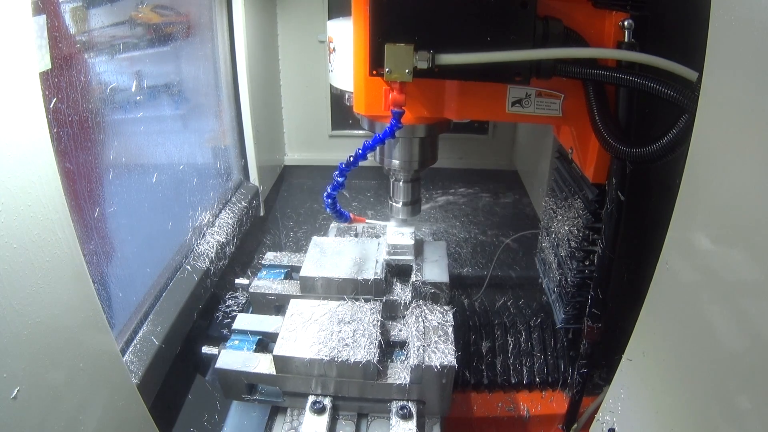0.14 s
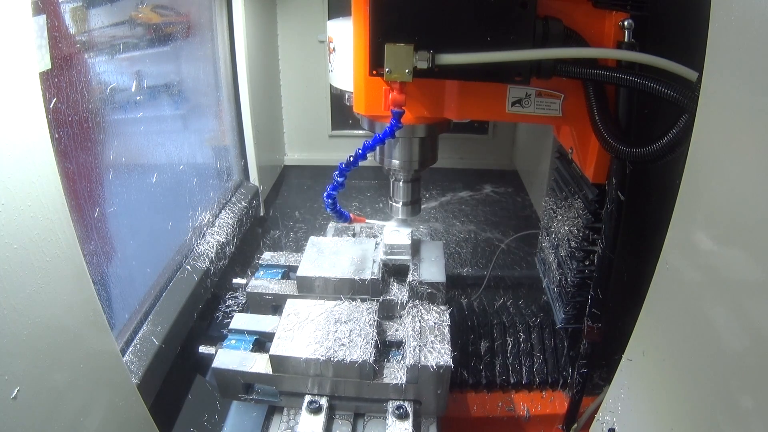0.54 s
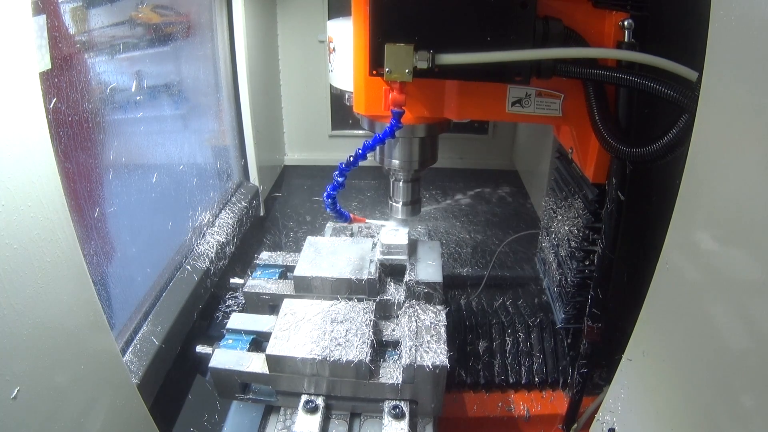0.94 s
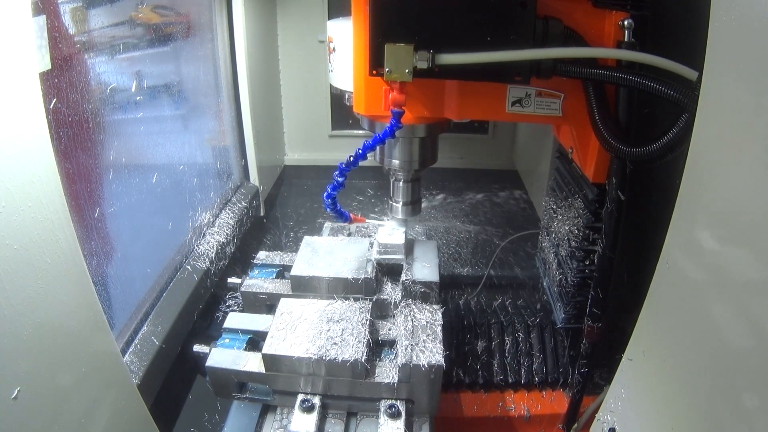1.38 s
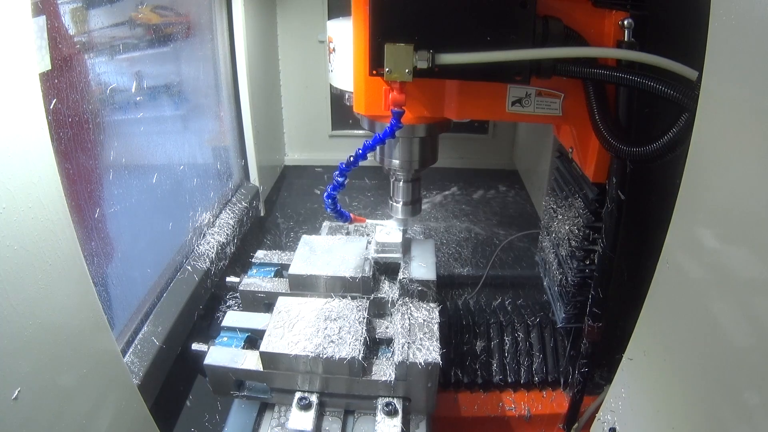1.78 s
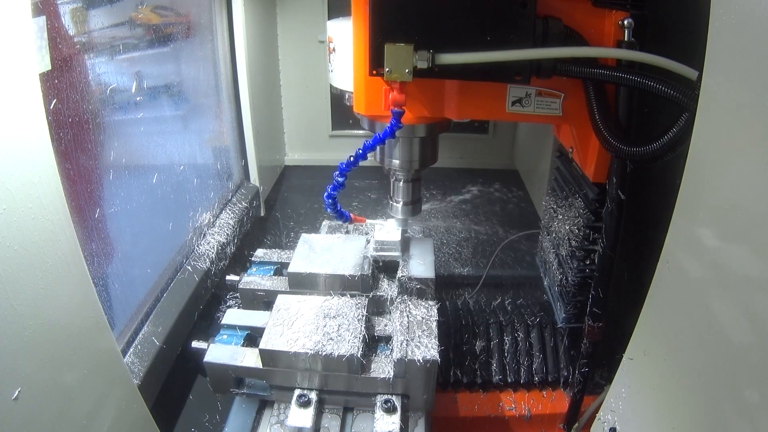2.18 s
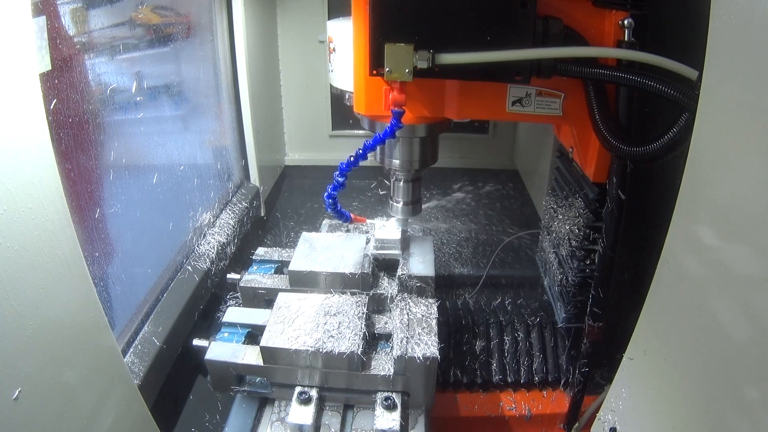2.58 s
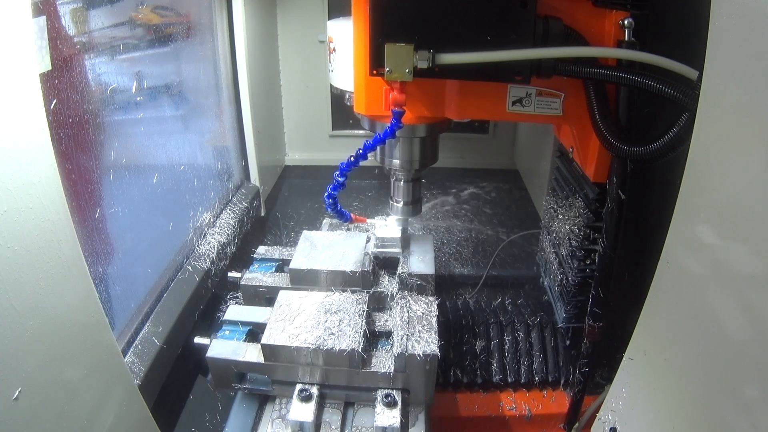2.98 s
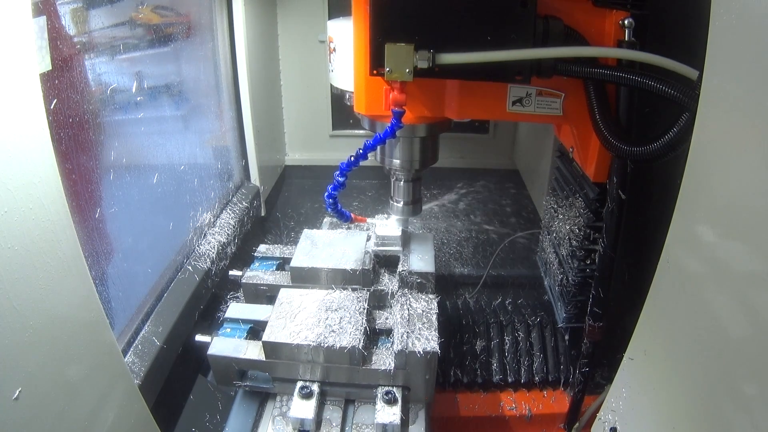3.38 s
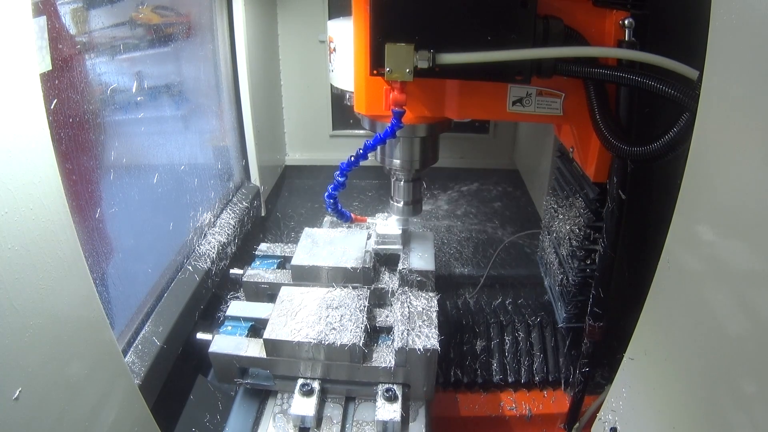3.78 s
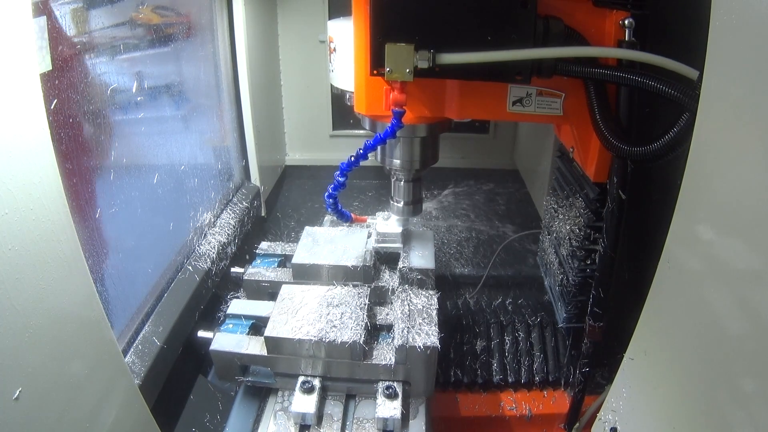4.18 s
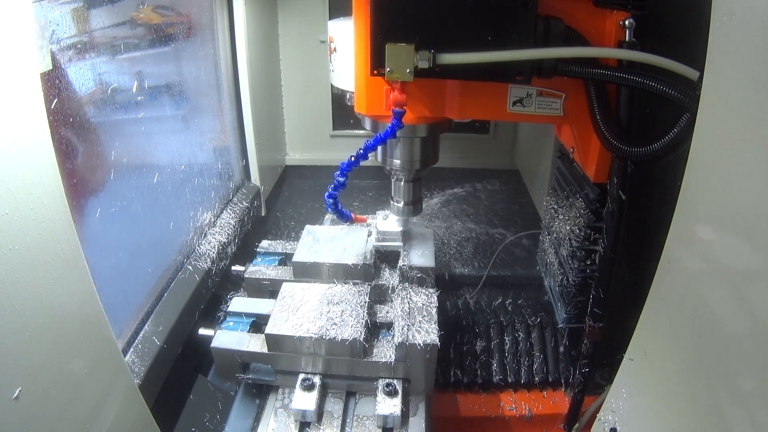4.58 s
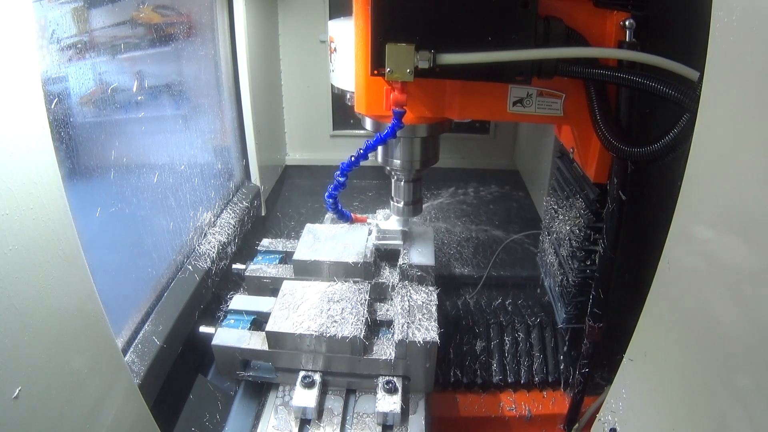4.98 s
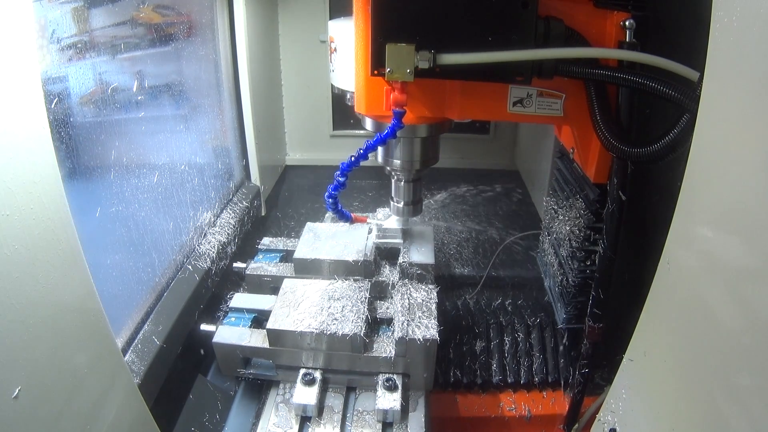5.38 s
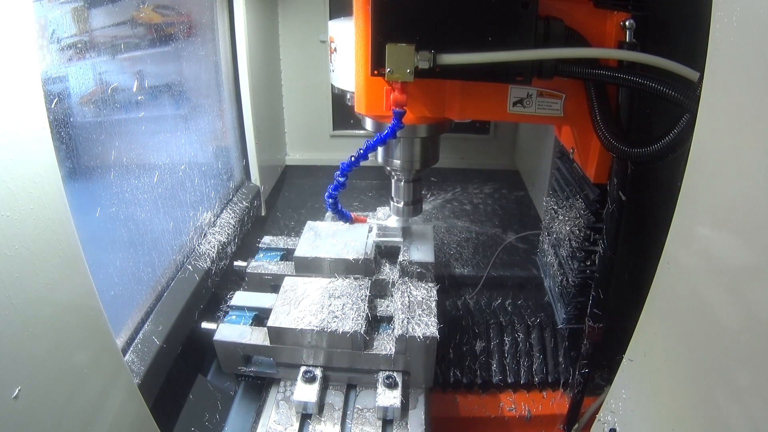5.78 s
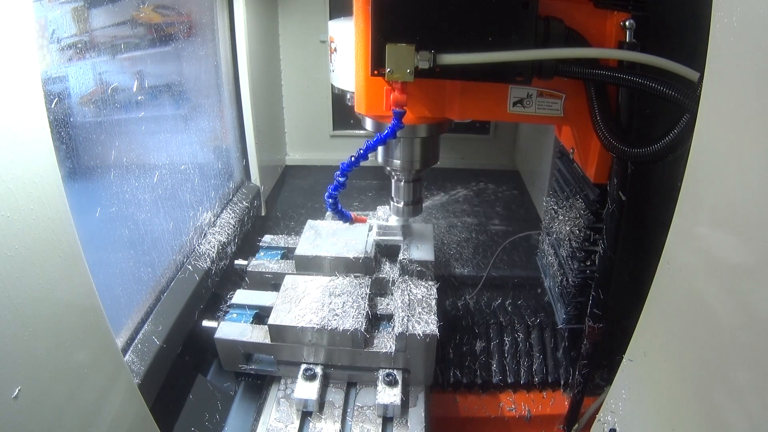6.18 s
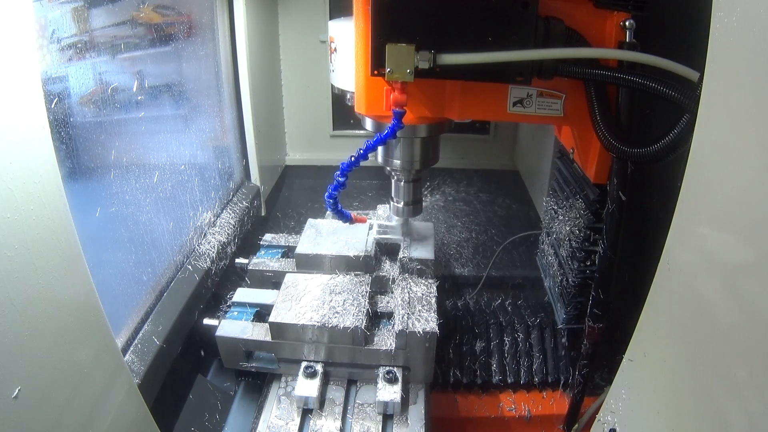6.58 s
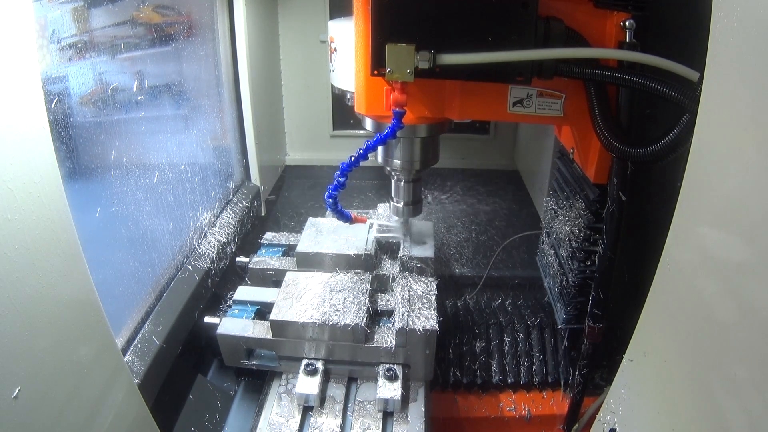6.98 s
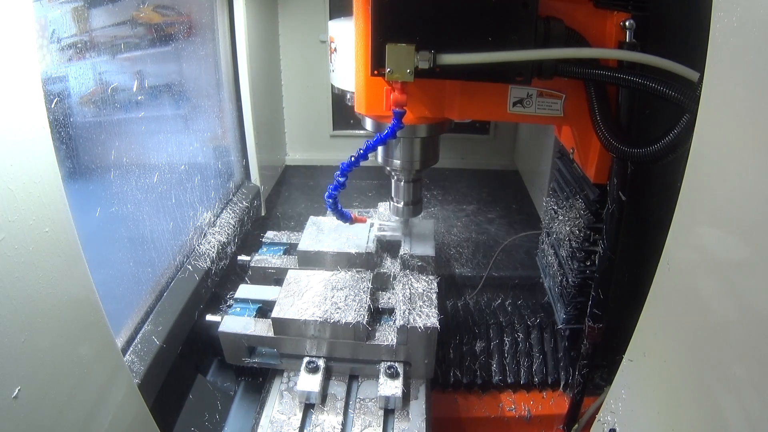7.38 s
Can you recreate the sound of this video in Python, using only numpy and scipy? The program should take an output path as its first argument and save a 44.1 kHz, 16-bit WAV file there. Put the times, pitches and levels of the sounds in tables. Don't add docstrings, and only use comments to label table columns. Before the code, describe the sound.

Steady, shrill metallic whine from a cutting spindle fills a small resonant machine box in a workshop. Individual tones slowly swell and fade as the work moves, with chatter and bearing buzz roughening them. Broad airy hiss and low rumble lie beneath. Midway into the first half the feed drive growls and a low thump marks reversal; a gentler surge comes near the end. Near stereo pickup, treble dull at the very top with slight flickering dropouts.

```python
import sys
import numpy as np
from scipy import signal
from scipy.fft import rfft, irfft, next_fast_len
from scipy.io import wavfile
from scipy.ndimage import uniform_filter1d

SR = 44100
rng = np.random.default_rng(int(sys.argv[2]) if len(sys.argv) > 2 else 0)


def int16_out(signal):
    q = np.round(np.clip(np.atleast_2d(signal).T, -1, 1) * 32767)
    wavfile.write(sys.argv[1], SR, q.astype(np.int16))


def nominal_scale(level):
    x = np.asarray(level, float) / 20
    return 10 ** x


N = 425565
TIME_S = np.arange(N) / SR

# [t/s, speed/(turns per s)]
SHAFT_SPEED = [(0.0, 112.533), (3.38, 112.538), (3.46, 112.622), (3.96, 112.488), (4.04, 112.534),
               (4.15, 112.77), (4.45, 112.629), (4.75, 112.461), (5.28, 112.542), (7.38, 112.536),
               (7.49, 112.448), (7.81, 112.561), (8.19, 112.654), (8.47, 112.607), (8.88, 112.42),
               (9.01, 112.495), (9.65, 112.555)]
SHAFT_HZ = SHAFT_SPEED[0][1]
# [start t/s, end t/s]
CORNERS = [
    (3.4, 4.2),
    (8.0, 8.6),
]
# [start t/s, end t/s]
FRAME_TURNS = [
    (3.65, 3.9),
    (8.05, 8.35),
]

# [order, first level/dB, return level/dB, third level/dB, left lead/rad]
STRONG_TONES = [(22, -37.5, -45.5, -51, -.7), (27.86, -37.5, -41.5, -38.5, -.5),
                (29.52, -43.5, -38.5, -35, .1), (29.86, -34.5, -31.5, -34.5, -.9),
                (37.48, -31, -42, -41, 0), (39.48, -36.5, -34.5, -38, -.1), (45, -38.5, -36.5, -39.5, -.1),
                (46, -42.5, -39.5, -41.5, -.1), (47, -41, -38, -32.5, -.3), (48, -36, -30, -40, -.2),
                (49, -26, -25, -24.5, -.1), (50, -27.5, -25.5, -26.5, -.1), (51, -22.5, -23, -22, -.4),
                (52, -30, -30.5, -34, .1), (53, -31.5, -34.5, -34.5, 0), (54, -40, -36.5, -45.5, -.1)]
REFLECTIONS = [(22.0, 0.25, 0.65, 0.13, 0.73), (27.86, 0.7, 0.77, 0.78, 0.7),
               (29.52, 0.45, 0.35, 0.46, 0.58), (29.86, 0.05, 0.72, 0.08, 0.7),
               (37.48, 0.27, 0.09, 0.15, 0.65), (39.48, 0.22, 0.58, 0.23, 0.29),
               (45.0, 0.24, 0.01, 0.43, 0.04), (46.0, 0.52, 0.55, 0.19, 0.95),
               (47.0, 0.08, 0.42, 0.45, 0.6), (48.0, 0.19, 0.31, 0.07, 0.77),
               (49.0, 0.11, 0.93, 0.18, 0.17), (50.0, 0.52, 0.84, 0.25, 0.61),
               (51.0, 0.43, 0.19, 0.19, 0.45), (52.0, 0.79, 0.45, 0.29, 0.15),
               (53.0, 0.17, 0.47, 0.11, 0.29), (54.0, 0.18, 0.56, 0.23, 0.58)]
# [t/s, length/cm]
VICE_DETOUR = [(0, 0), (1.5, 1.65), (3, 3.7), (3.6, 4.7), (4.2, 4.1), (4.8, 5.3), (6.3, 6.95), (7.8, 9.3),
               (8.5, 10.6), (9.65, 10.9)]
TABLE_DETOUR_RATIO, SOUND_CM_PER_S = 1.77, 34300
# [t/s, left-right level/dB]
TOOL_PAN = [(0.0, 2.5), (1.21, 4.5), (2.58, -1), (4.84, 2), (6.96, -2), (7.55, 1), (8.28, -4.5), (9.65, 1)]
TOOL_FROM_ORDER = 44.5
STRIKE_CENTRE_ORDER = 50.5
STRIKE_SPREAD = .118
FLUTTER_DB, WANDER_CYCLES = .5, .045
BELT_TURNS = 26
BELT_TUG = (.0002, .00075, .0005)
BELT_START_LAPS = .63

# [order, first level/dB, return level/dB, left lead/rad]
CUTTER_TONES = [(2, -45.5, -44.0, -0.1), (6, -65.0, -47.5, -1.3), (7, -54.0, -50.0, -1.4),
                (8, -49.0, -51.0, -1.0), (9, -58.0, -50.5, -0.3), (12, -49.0, -47.0, -0.6),
                (20, -51.0, -53.0, -0.6), (21, -48.0, -45.0, -0.5), (24, -50.0, -49.0, -0.6),
                (25, -41.0, -47.0, -0.7), (27, -41.0, -48.0, -0.5), (30, -47.0, -44.5, -0.7),
                (31, -50.0, -52.0, -0.3), (34, -48.0, -53.0, -0.2), (38, -45.0, -46.0, -0.0),
                (40.043, -43.0, -48.0, -0.1), (44, -41.0, -43.0, -0.0), (55, -48.0, -43.0, -0.1),
                (57, -50.0, -53.0, -0.6), (58, -44.0, -44.0, -0.4), (63, -53.0, -59.0, -0.9),
                (67, -49.0, -51.0, 0.3), (69, -54.0, -53.0, -0.5), (72, -56.0, -60.0, -0.1),
                (73, -57.0, -55.0, -0.6), (94, -66.0, -69.0, -0.2), (95, -66.0, -65.0, -0.2),
                (96, -64.0, -63.0, -0.4), (97, -61.0, -61.0, -0.1)]
# [order, first level/dB, return level/dB, left lead/rad]
MOTOR_TONES = [(0.73, -57.0, -52.0, 0.0), (1.655, -48.0, -50.0, -0.1), (2.42, -50.0, -52.0, -0.2),
               (2.66, -55.0, -54.0, -0.1), (3.67, -52.0, -52.0, -0.6), (4.59, -41.5, -45.5, -0.4),
               (5.48, -60, -46.5, -1.1), (6.88, -53.0, -54.0, -1.5), (7.38, -54.0, -55.0, -1.0),
               (8.238, -39.5, -38.0, -1.1)]
# [order, first level/dB, return level/dB,
# left lead/rad]
BEARING_AND_SIDEBAND_TONES = [(9.62, -47.0, -57.0, -0.9), (10.62, -47.0, -43.5, -0.8), (15.86, -59.0, -55.0, -0.5),
                              (18.24, -50.0, -54.0, -0.4), (20.24, -46.0, -48.0, -0.3), (20.55, -54.0, -50.0, -0.6),
                              (27.29, -60, -48.0, -0.9), (28.42, -52.0, -45.0, -0.4), (29.29, -44.0, -43.0, -0.6),
                              (30.42, -47.0, -42.5, -0.4), (30.86, -51.0, -53.0, -0.4), (38.91, -38.0, -50.0, 0.0),
                              (56.71, -48.0, -51.0, -0.3), (57.28, -52.0, -52.0, -0.3), (59.15, -49.0, -45.0, -0.7),
                              (59.71, -51.0, -49.0, -0.9), (60.28, -49.0, -57.0, 0.1), (65.9, -54.0, -53.0, -0.1),
                              (66.47, -53.0, -60.0, 0.2), (68.77, -45.0, -47.0, -0.3), (69.33, -50.0, -56.0, -0.2),
                              (9.627, -53.0, -62.0, -0.9),
                              (1.4, -47, -47, 0), (5, -58, -51, -.6), (10, -60, -58, -.8), (11, -60, -52, -.7),
                  (26.962, -47, -49, -.6), (29.088, -58, -49, -.6), (29.423, -56, -48, -.6),
                  (29.496, -58, -48, -.5), (29.957, -58, -43, -.8), (38.041, -54, -44, 0),
                  (38.498, -56, -47, 0), (39.423, -42, -54, 0), (39.462, -46, -55, 0), (43.85, -56, -47, 0),
                  (46.153, -49, -47, -.1), (49.094, -42, -54, -.1), (53.962, -44, -54, -.1)]
# [order, level/dB]
THIRD_PASS = [(4.59, -42), (5.48, -53), (29.29, -42), (6, -46), (8, -62), (8.238, -41), (9, -44),
              (9.62, -47), (10.62, -54), (12, -39), (10, -49), (5, -51), (29.957, -50), (20.24, -60),
              (24, -53), (28.42, -49), (30, -50), (55, -58)]
# [order, t/s, level/dB, half width/s]
TONE_SWELLS = [(1, 3.55, -9, .1), (4, 3.7, -9, .2), (4, 4.1, -4, .15), (4, 7.9, 2, .4), (5.48, 3.8, -6, .3),
               (22, 3.9, 3, .3), (29.29, 3.8, 8, .6), (29.29, 6.9, 5, .35), (29.86, 0, -3, .5),
               (29.86, 3.4, -7, .25), (29.86, 8.2, -3, .25), (29.86, 4.7, 2, .25), (22, 1.5, 1, 1.5),
               (30, 3.8, -8, .3), (30.42, 3, 4, .6), (30.42, 8, 5, .5), (12, 3, 9, .4), (12, 4.8, 6, .4),
               (12, 6.2, -4, .4), (12, 7.7, 5, .3), (55, .4, -9, .7), (55, 5, -12, .9), (44, 1.35, -8, .2),
               (44, 3.3, 3, .8), (44, 9, -3, .5), (30, 7.9, -12, .3), (39.48, .3, -5, .4),
               (37.48, 7.9, -10, .3), (50, 8.2, -7, .15), (52, 0, -4, .2), (4, 8.3, 2, .3),
               (4, 5.4, -3, .7), (3, 8.35, -8, .2), (3, 9.2, 3, .4), (51, 3.7, 1.5, .3), (49, 4.2, -2, .15),
               (4.59, 7.3, -2, .5), (68.77, 0, -7, .4), (68.77, 4.9, -5, .6), (68.77, 8.4, 4, .4),
               (97, 5.7, 6, .25), (97, 9.2, 6, .35), (28.42, 6.5, 2, 1)]
# [order, first silence t/s, beat/s, first level/dB, later level/dB]
BEATING_PAIR = (36.907, .9, 1.252, -39, -41.5)
BALL_PASS_ORDER, CAGE_ORDER = 9.62, .567
# [order, first level/dB, return level/dB]
CHATTER_LINES = [(44.519, -47, -55), (44.673, -46, -47), (44.75, -49, -49), (45.519, -54, -44),
                 (45.596, -48, -54), (45.635, -47, -54), (45.673, -47, -54), (45.75, -48, -55),
                 (46.519, -48, -51), (46.558, -38, -39), (46.596, -39, -41), (46.673, -47, -52),
                 (46.712, -47, -54), (47.519, -44, -48), (47.558, -48, -54), (47.635, -47, -55),
                 (48.519, -54, -41), (48.558, -55, -45), (48.635, -55, -49), (49.442, -45, -39),
                 (49.481, -53, -47), (49.519, -43, -47), (49.558, -35, -35), (50.404, -46, -53),
                 (50.442, -44, -40), (50.481, -41, -43), (50.519, -35, -33), (50.558, -35, -42),
                 (50.596, -43, -53), (51.481, -40, -47), (51.519, -41, -51), (52.404, -47, -52),
                 (52.481, -46, -51), (53.481, -46, -51), (53.519, -48, -52), (54.365, -48, -48),
                 (54.404, -47, -48)]
CHATTER_EASES_DB = -3

FRAME_ORDERS = (.45, 1, 3, 4)
# [first level/dB, return level/dB, third level/dB, share of feed surge, left lead/rad]
FRAME_LEVELS = [(-53.5, -51.5, -60, 0.97, 0), (-43.5, -34.5, -46.5, .01, 0.083),
                (-54, -47, -51.5, 0.18, -0.73), (-50.5, -44, -42.5, 0.68, -0.7)]
# [t/s, level/dB, start f/Hz, end f/Hz, length/s]
FRAME_JOLT = (3.35, -27, 192, 135, .13)
FEED_LEVELS = (-31.5, -30, -34)
# [f/Hz, width/Hz, level/dB]
FEED_MODES = [(1200, 45, 8), (1366, 108, 13.5), (1585, 38, 6)]
# [t/s, rise level/dB, half width/s]
FEED_SURGES = [
    (3.58, 7.5, 0.11),
    (3.87, 6, 0.074),
    (4.1, 4.5, 0.094),
    (4.35, 5.5, 0.086),
    (7.5, 3.5, 0.96),
    (7.95, 3, 0.06),
    (8.3, 5.5, 0.1),
]

# [t/s, level/dB]
CUT_LOAD = [(0, -43.5), (.9, -42), (2.7, -41), (4.4, -41.5), (5.25, -43), (6.8, -41), (8.3, -41),
            (9, -43.5), (9.65, -43)]
# [f/Hz, level/dB per Hz]
AIR_COLOUR = [(30, -18), (60, -54), (130, -1.5), (300, -8), (800, -6.5), (1300, -12), (1900, -8.5),
              (3300, -6.5), (5600, -7.5), (6700, -6.5), (6900, -16), (8200, -20), (10300, -30),
              (10950, -25)]
# [f/Hz, width/Hz, level/dB]
BOX_MODES = [(505, 91, 13.5), (943, 68, 7), (4150, 150, 1), (5450, 520, 15), (7730, 180, 12),
             (8170, 210, 8.5)]
# [f/Hz, width/Hz]
COLOUR_DIPS = [(370, 285), (412, 42), (572, 42), (1560, 150), (860, 130), (1055, 8.3), (1480, 190),
               (1986, 370), (3990, 210), (5430, 290), (6200, 220), (2560, 63)]
# [f/Hz, width/Hz, level/dB]
PANEL_MODES = [(184, 5.1, 1), (216, 110, -12.5), (144, 39, -18.5)]
# [t/s, rise level/dB, half width/s]
PANEL_BOOMS = [
    (.75, 2, 0.13),
    (2.2, 4.5, 0.1),
    (2.65, 4, 0.079),
    (3.75, 4, 0.1),
    (4.45, 7, 0.1),
    (7.5, 6.5, 0.1),
    (7.85, 4, 0.03),
    (8.1, 4.5, 0.057),
]
PANEL_DB, PANEL_PER_SURGE, PANEL_PER_LOAD = -39, .1, .37
# [f/Hz, width/Hz, level/dB]
FLOOR_MODES = [(50, 13, -7), (81.5, 3.2, 9), (62, 40, -12)]
FLOOR_DB = -52.5

# [f/Hz, left-right likeness]
PORT_LIKENESS = [(60, 0.85), (130, 0.99), (260, 0.91), (550, 1), (1160, 0.7), (2440, 1), (5130, 1),
                 (10800, 0.64)]
# [f/Hz, lead/rad]
PORT_LEAD = [(0, -0.12), (300, -0.12), (780, -1.26), (1290, -0.55), (3360, -1.22), (4050, -0.21),
             (6720, -1.1), (10900, 0.25)]
# [f/Hz, left-right level/dB]
PORT_BALANCE = [(60, 0.0), (110, 0.0), (190, 1.5), (340, 2.0), (600, 2.5), (1070, -1.0), (1910, 0.0),
                (3400, -0.5), (6050, 0.0), (10800, -0.5)]
CUTOFF_HZ = 11000
# [t/s, upper band level/dB, lower band level/dB]
TREBLE_FADES = [(.08, -8, -4), (1.05, -9, 0), (1.45, -6, -4), (2.4, -8, 0), (3.8, -22, -3), (3.96, -20, -8),
                (4.11, -16, -14), (4.68, -10, -4), (4.9, -14, -4), (4.97, -20, -10), (5.2, -14, -6),
                (5.33, -16, -4), (5.37, -18, -18), (5.62, -25, -8), (5.82, -16, -8), (6.32, -25, -22),
                (7.0, -14, -3), (7.22, -18, -8), (7.72, -18, -3), (8.38, -14, -3), (8.83, -14, -3),
                (9.02, -8, -5), (9.15, -14, -10), (9.24, -14, -12), (9.35, -25, -15), (9.57, -22, -12)]
# [low f/Hz, high f/Hz]
FADING_BANDS = ((8800, 10400), (6500, 7300))
FADE_HALF_WIDTH_S = .013
HOLE_EDGES_HZ, HOLE_SHARE = np.arange(8700, 10900, 240), .07


def strong_tones(turns, belt_db, sway):
    (detour_cm,), (tool_pan_db,) = in_time(VICE_DETOUR), in_time(TOOL_PAN)
    tug = by_pass(BELT_TUG) * np.sin(2 * np.pi * (turns / BELT_TURNS - BELT_START_LAPS))
    out = 0
    for direct, reflected in zip(STRONG_TONES, REFLECTIONS):
        order, *levels_db, lead = direct
        _, vice, vice_phase, table, table_phase = reflected
        from_tool = order > TOOL_FROM_ORDER
        waves = detour_cm[::64] * order * SHAFT_HZ / SOUND_CM_PER_S
        off_vice = vice * np.exp(2j * np.pi * (vice_phase + waves))
        off_table = table * np.exp(2j * np.pi * (table_phase + TABLE_DETOUR_RATIO * waves))
        summed = 1 + off_vice + off_table
        gain = every_sample(abs(summed) + .03)
        shift = every_sample(np.unwrap(np.angle(summed)) / (2 * np.pi))
        level_db = by_pass(levels_db) + tone_swell(order) + belt_pulse(turns, belt_db) + FLUTTER_DB * drift(3.9)
        pan_db = tool_pan_db if from_tool else at_hz(PORT_BALANCE, order * SHAFT_HZ)
        start = STRIKE_SPREAD * (order - STRIKE_CENTRE_ORDER) ** 2 if from_tool else rng.random()
        phase = start - shift + tug * order * from_tool + WANDER_CYCLES * drift(.2)
        out = out + gain * tone(turns, order, level_db, pan_db, lead + sway * drift(.58), phase)
    return out


def shaft_tones(table, turns, waver_db, belt_db, sway):
    out = 0
    for order, first_db, return_db, lead in table:
        level_db = pass_level(order, first_db, return_db) + waver_db * drift(.33)
        level_db = level_db + belt_pulse(turns, belt_db)
        pan_db = at_hz(PORT_BALANCE, order * SHAFT_HZ) + rng.normal(0, 1) * (order > 2)
        creep = drift(.12) / 5 / max(order, 10)
        out = out + tone(turns + creep, order, level_db, pan_db, lead + sway * drift(.0093))
    return out


def chatter(turns, waver_db):
    out = np.zeros(N)
    for order, first_db, return_db in CHATTER_LINES:
        level_db = by_pass([first_db, return_db, return_db + CHATTER_EASES_DB]) + waver_db * drift(.5)
        order = (np.floor(order * BELT_TURNS) + .5) / BELT_TURNS
        angle = 2 * np.pi * ((order * turns + rng.random()) % 1)
        out += np.repeat(nominal_scale(level_db[::64]), 64)[:N] * np.cos(angle.astype(np.float32))
    return np.sqrt(2) * out


def beating_pair(turns):
    order, first_silence, beat, first_db, later_db = BEATING_PAIR
    swing = 2 * np.sin(np.pi * (TIME_S - first_silence) / beat)
    return swing * tone(turns, order, by_pass([first_db, later_db, later_db]) + drift(.36), 0, 0)


def frame_tones(turns, surge_db):
    out = 0
    for order, (*levels_db, share, lead) in zip(FRAME_ORDERS, FRAME_LEVELS):
        level_db = by_pass(levels_db, FRAME_TURNS) + tone_swell(order) + share * surge_db + 1.84 * drift(.76)
        out = out + tone(turns, order, level_db, 0, lead)
    return out


def jolt():
    start, level_db, start_hz, end_hz, length = FRAME_JOLT
    age = np.clip((TIME_S - start) / length, 0, 1.5)
    hz = start_hz + (end_hz - start_hz) * np.clip(age, 0, 1) ** 2
    return nominal_scale(level_db) * np.sin(np.pi * age / 1.5) * np.sin(2 * np.pi * np.cumsum(hz) / SR)


def feed_drive(surge_db):
    return nominal_scale(by_pass(FEED_LEVELS) + surge_db - 6) * stereo_noise(lambda hz: resonances(FEED_MODES, hz))


def air_and_chips(turns, throb):
    noise = stereo_noise(lambda hz: box_colour(hz) * dense_modes(hz, spacing_hz=16, depth_db=3))
    return noise * (1 + throb * np.cos(2 * np.pi * turns))


def faint_tones(turns, spread_db, waver_hz):
    laps, steps = 1100, 1024
    ball, shaft, cage = np.meshgrid(np.arange(11), np.arange(-4, 5), np.arange(-1, 2))
    bearing_orders = (ball * BALL_PASS_ORDER + shaft + cage * CAGE_ORDER).ravel()
    orders = np.r_[np.arange(2, 97), bearing_orders]
    orders = orders[(orders > 2) & (orders < 97)]
    hz = orders * turns[-1] * SR / N
    near = np.arange(-12, 13)
    skirt = np.exp(-(near * SR / N / waver_hz) ** 2 / 2)
    height = box_colour(hz) * nominal_scale(spread_db * rng.standard_normal(len(hz)))
    chance = rng.standard_normal((2, len(hz), len(near)))
    lead = at_hz(PORT_LEAD, hz) + rng.standard_normal(len(hz))
    bins = np.round(orders * laps).astype(int)[:, None] + near
    spectrum = np.zeros((2, laps * steps // 2 + 1), complex)
    for side, way in enumerate((1, -1)):
        lines = (height * np.exp(.5j * way * lead))[:, None] * skirt * (chance[0] + 1j * chance[1])
        np.add.at(spectrum[side], bins, lines)
    waves = irfft(spectrum)
    return rms_one(np.array([np.interp(turns * steps, np.arange(laps * steps), w) for w in waves]))


def loose_panel(surge_db, air_db):
    level_db = PANEL_DB + surge(PANEL_BOOMS) + PANEL_PER_SURGE * surge_db
    level_db = level_db + PANEL_PER_LOAD * (air_db - air_db.mean())
    return nominal_scale(level_db + .5) * stereo_noise(lambda hz: resonances(PANEL_MODES, hz))


def floor_rumble(surge_db):
    level_db = FLOOR_DB + 1.34 * surge_db + 2.9 * drift(.8)
    return nominal_scale(level_db) * stereo_noise(lambda hz: resonances(FLOOR_MODES, hz))


def tone(turns, order, level_db, pan_db, lead, phase=None):
    phase = rng.random() if phase is None else phase
    angle = 2 * np.pi * ((order * turns + phase) % 1)
    height = np.sqrt(2) * nominal_scale(level_db)
    ports = []
    for way in (1, -1):
        wave = np.cos((angle + way * lead / 2).astype(np.float32))
        ports.append(height * nominal_scale(way * pan_db / 2) * wave)
    return np.array(ports)


def stereo_noise(gain_at):
    size = next_fast_len(N)
    hz = np.fft.rfftfreq(size, 1 / SR)
    mid, side = rfft(rng.standard_normal((2, size)))
    alike = np.clip(at_hz(PORT_LIKENESS, hz), 0, 1)
    left = nominal_scale(at_hz(PORT_BALANCE, hz) / 2) * np.exp(.5j * at_hz(PORT_LEAD, hz))
    pair = [(np.sqrt(1 + alike) * mid + way * np.sqrt(1 - alike) * side) * left ** way for way in (1, -1)]
    return rms_one(irfft(gain_at(hz) * np.array(pair), size)[:, :N])


def box_colour(hz):
    nulls = np.prod([1 - .5 * peak(hz, centre, width) for centre, width in COLOUR_DIPS], axis=0)
    return nominal_scale(at_hz(AIR_COLOUR, hz)) * (1 + resonances(BOX_MODES, hz) / 2.5) * nulls


def dense_modes(hz, spacing_hz, depth_db):
    return nominal_scale(depth_db * np.interp(hz, np.arange(800) * spacing_hz, rng.standard_normal(800)))


def resonances(modes, hz):
    return sum(nominal_scale(db) * peak(hz, centre, width) for centre, width, db in modes)


def peak(hz, centre, width):
    return 1 / (1 + ((hz - centre) / (width / 2)) ** 2)


def pass_level(order, first_db, return_db):
    return by_pass([first_db, return_db, dict(THIRD_PASS).get(order, return_db)]) + tone_swell(order)


def by_pass(levels, corners=CORNERS):
    return np.interp(TIME_S, np.ravel(corners), np.repeat(levels, 2)[1:-1])


def tone_swell(order):
    return surge([row[1:] for row in TONE_SWELLS if row[0] == order])


def surge(events):
    return sum(db * np.exp(-((TIME_S - s) / width) ** 2 / 2) for s, db, width in events)


def belt_pulse(turns, depth_db):
    return depth_db * np.cos(2 * np.pi * (turns / BELT_TURNS + rng.random()))


def drift(rate):
    r = np.exp(-128 * np.pi * rate / SR)
    slow = signal.lfilter([1], [1, -2 * r, r * r], rng.standard_normal(N // 64 + 2002))[2000:]
    return every_sample(rms_one(slow))


def every_sample(slow):
    return np.interp(np.arange(N) / 64, np.arange(len(slow)), slow)


def in_time(rows):
    s, *columns = np.transpose(rows)
    return [np.interp(TIME_S, s, column) for column in columns]


def at_hz(points, hz):
    table_hz, values = np.array(points).T
    return np.interp(np.log(hz + 1), np.log(table_hz + 1), values)


def rms_one(x):
    return x / np.sqrt(np.mean(x ** 2) + 1e-20)


def scene():
    turns = np.cumsum(in_time(SHAFT_SPEED)[0]) / SR
    (air_db,), surge_db = in_time(CUT_LOAD), surge(FEED_SURGES)
    strong = strong_tones(turns, belt_db=.84, sway=.23) + frame_tones(turns, surge_db)
    flutes = shaft_tones(CUTTER_TONES, turns, waver_db=1.5, belt_db=.4, sway=.2)
    rolling = MOTOR_TONES + BEARING_AND_SIDEBAND_TONES
    balls = shaft_tones(rolling, turns, waver_db=.9, belt_db=.8, sway=.15) + beating_pair(turns)
    tones = nominal_scale(.2) * (flutes + strong) + nominal_scale(.5) * balls + nominal_scale(.5) * chatter(turns, waver_db=1.5)
    air = nominal_scale(air_db + 17) * air_and_chips(turns, throb=.031)
    faint = nominal_scale(air_db + 6) * faint_tones(turns, spread_db=3, waver_hz=.5)
    structure = feed_drive(surge_db) + loose_panel(surge_db, air_db) + floor_rumble(surge_db) + jolt()
    return tones + air + faint + structure


def top_cut(x):
    return signal.sosfilt(signal.butter(12, 11370, fs=SR, output="sos"), x)


def record(dry):
    out = signal.sosfilt(signal.ellip(14, .3, 90, CUTOFF_HZ, fs=SR, output="sos"), dry)
    for k, edges in enumerate(FADING_BANDS):
        band = signal.sosfiltfilt(signal.butter(6, edges, "band", fs=SR, output="sos"), out)
        fades_db = surge([(row[0], row[k + 1], FADE_HALF_WIDTH_S) for row in TREBLE_FADES])
        out = out + band * (nominal_scale(fades_db) - 1)
    for low, high in zip(HOLE_EDGES_HZ, HOLE_EDGES_HZ[1:]):
        band = signal.sosfiltfilt(signal.butter(3, [low, high], "band", fs=SR, output="sos"), out)
        gone = np.repeat(rng.random(N // 1536 + 1) < HOLE_SHARE, 1536)[:N]
        out = out - band * uniform_filter1d(gone * 1., size=400)
    return top_cut(out)


dry = scene()
out = record(dry)
int16_out(out)
```